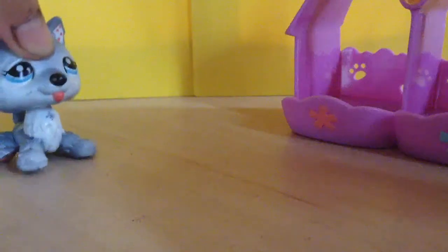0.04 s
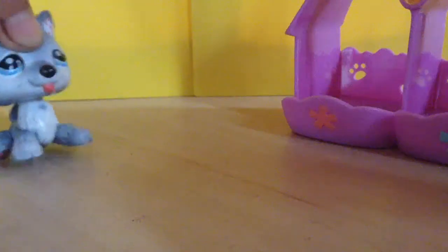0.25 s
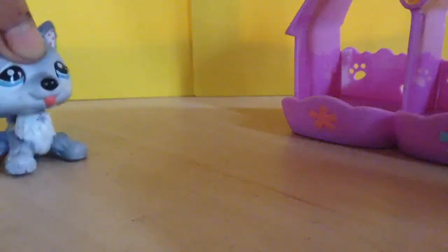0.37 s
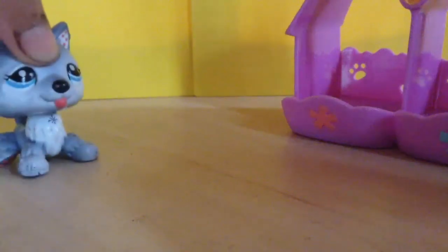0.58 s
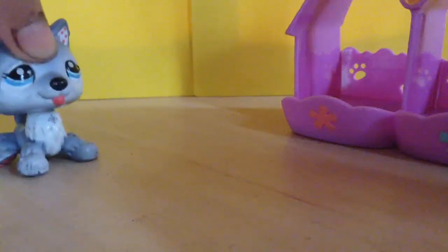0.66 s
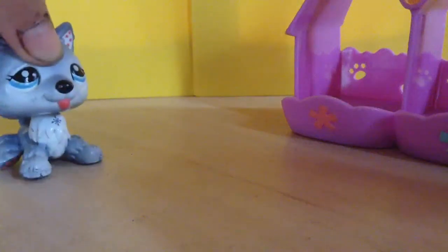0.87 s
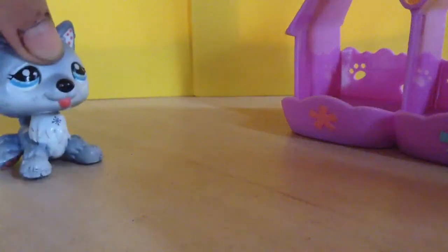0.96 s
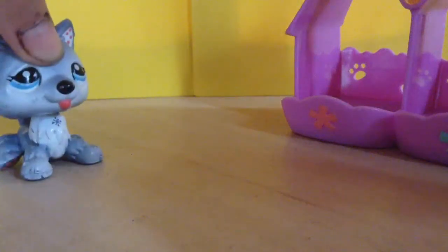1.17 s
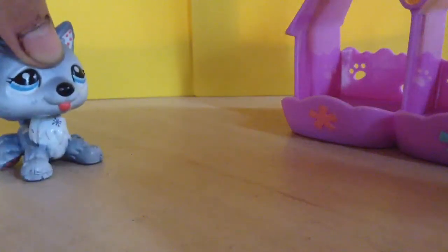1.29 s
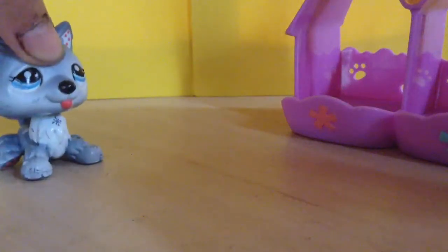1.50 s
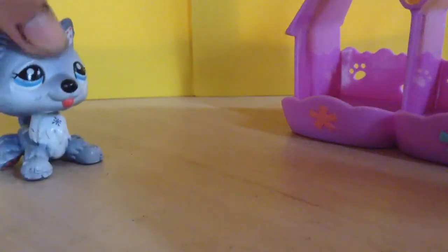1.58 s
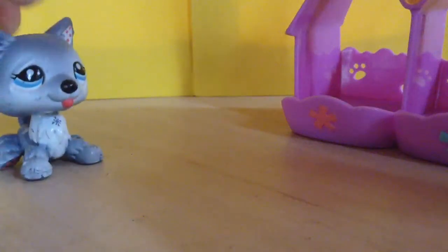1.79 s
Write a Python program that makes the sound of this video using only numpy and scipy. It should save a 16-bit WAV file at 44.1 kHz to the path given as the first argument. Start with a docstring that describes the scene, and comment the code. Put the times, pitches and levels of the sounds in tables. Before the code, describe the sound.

Small woody clacks as a light plastic toy is walked over a table, with faint scuffs

```python
"""In a small room, a hand walks a hollow plastic figure over a wooden table top, close to a microphone.
The feet tap and scuff the board: short pushes and tiny catches ring its modes, a short, woody sound.
The loose plastic head ticks in the treble: a knock and a brief rattle ring the modes of the shell.
Filtered noise, dying away, gives the room its short tail; faint shaped noise is the rumble and hiss."""
import sys
import numpy as np
from scipy import signal
from scipy.fft import rfft, irfft
from scipy.io import wavfile

SR = 44100
rng = np.random.default_rng(int(sys.argv[2]) if len(sys.argv) > 2 else 0)


def convert_level_to_amplitude(level_db):
    """Map a level in decibels to its linear amplitude factor."""
    exponent = np.asarray(level_db, float) / 20
    return 10 ** exponent


def digitize_waveform(pressure):
    """Quantize a signal to 16-bit integers and store it at the path in sys.argv[1].

    Rows of a 2-D input are taken as channels; values are limited to [-1, 1].
    """
    field = np.atleast_2d(pressure).T
    bounded = np.clip(field, -1, 1)
    quanta = np.round(bounded * 32767).astype(np.int16)
    wavfile.write(sys.argv[1], SR, quanta)


N = 81585

# feet landing on the board: t/s, peak level/dB of the wood, f/Hz that this spot favours,
# level/dB of the shell's ring relative to the wood (the sharp edge of the contact)
FOOT_TAPS = [(0.027, -47, 680, -45), (0.053, -43, 1040, -22), (0.108, -36, 1050, -42),
             (0.228, -31.5, 507, -23), (0.339, -17, 1074, -20), (0.354, -14, 985, -28),
             (0.3801, -17, 965, -22.5), (0.451, -36.5, 660, -22), (0.497, -26, 960, -57),
             (0.517, -32, 600, -55), (0.577, -20, 634, -30), (0.5955, -23, 760, -30),
             (0.6113, -24, 1090, -21), (0.709, -42.5, 900, -21), (0.721, -24.5, 780, -26),
             (0.756, -33.5, 527, -12), (0.827, -12, 1030, -21.5), (0.845, -24, 620, -60),
             (0.863, -27, 880, -46), (0.872, -23.5, 565, -22), (1.04, -38.5, 650, -17.5),
             (1.086, -37.5, 555, -43), (1.105, -39, 1010, -23), (1.128, -34.5, 714, -15),
             (1.135, -22, 776, -30), (1.286, -37.5, 736, -24), (1.296, -22, 687, -31),
             (1.35, -37, 1080, -0.5), (1.591, -24, 927, -21), (1.648, -37, 665, -23),
             (1.748, -42.5, 581, -39), (1.777, -45.5, 1330, -35)]
# further taps, each on the spot and with the edge of the tap before it: t/s, peak level/dB of the wood
FOLLOW_TAPS = [(.06, -34), (.115, -31.5), (.129, -31), (.2294, -20.5), (.342, -31), (0.3575, -24.5),
               (.359, -16), (0.3609, -16), (.364, -19.5), (0.3878, -35.5), (.51, -35.5), (.5803, -32),
               (.598, -20.5), (0.6143, -16.5), (0.8302, -22.5), (.849, -19.5), (1.2919, -36.5), (1.601, -28)]
# ticks of the loose head: t/s, peak level/dB, favoured f/Hz
HEAD_TICKS = [(0.0641, -56, 8100), (0.3386, -52, 6960), (0.4773, -52.5, 10800), (0.4973, -61, 9900),
              (0.6095, -55, 10800), (0.827, -45, 8500), (0.846, -51, 7360), (0.8615, -43, 9600),
              (1.0335, -53.5, 10800), (1.1253, -51.5, 12500), (1.287, -51.5, 13400), (1.573, -43, 9460),
              (1.5901, -47, 8000)]
# feet dragged over the grain: start t/s, length t/s, rms level/dB, favoured f/Hz
FOOT_SCUFFS = [(0.196, 0.022, -61.5, 913), (0.238, 0.042, -60.5, 664), (0.466, 0.069, -64, 3750),
               (0.494, 0.027, -48.5, 656), (0.733, 0.033, -54.5, 564), (1.025, 0.059, -66.5, 953),
               (1.098, 0.05, -60.5, 4530), (1.157, 0.058, -66.5, 990), (1.208, 0.076, -70.5, 2360),
               (1.289, 0.074, -54.5, 2260), (1.573, 0.049, -55, 3580), (1.601, 0.067, -59, 680),
               (1.724, 0.067, -64, 268)]
# ringing modes of the wooden board: f/Hz, relative level/dB, time to fall by 60 dB t/s
BOARD_MODES = [(293.3, -5.5, 0.1), (607.6, -4.5, 0.069), (680, -6.5, 0.043), (762.4, 8, 0.015),
               (980, 4, 0.026), (1094.5, 1.5, 0.019), (1395, -1, 0.015), (1475.8, -3.5, 0.045),
               (2360, -7, .015)]
# ringing modes of the plastic shell: f/Hz, relative level/dB, time to fall by 60 dB t/s
SHELL_MODES = [(2735, 9, 0.0018), (3750, -2, 0.01), (4800, -4.5, 0.0079), (7470, 1.5, 0.0056),
               (8940, -3.5, 0.0086), (10290, 4, 0.0032), (12960, -3.5, .006)]
# colour of the rumble and hiss: f/Hz, relative level/dB per Hz
FLOOR_COLOUR = [(40, -21.5), (170, 4.5), (1140, -14.5), (2500, -3.5), (15000, -8)]

SCATTER_DB, DETUNE = 3.5, 0.04  # random spread of each mode's level (dB) and pitch (share)
SHELL_RISE_S = 0.0001  # time in which the shell swells up
SHELL_DEPTH_DB = 30  # most that a tap or tick weakens a shell mode


def fade(t, t60):
    """Falls by 60 dB in t60 seconds."""
    return np.exp(-np.log(1000) * t / t60)


def add(out, x, start_s):
    """Mixes x into out from start_s seconds on."""
    i = int(start_s * SR)
    out[i:i + len(x)] += x[:len(out) - i]


def ring(modes, gain_db, rise_s=0, detune=0):
    """One blow starts a set of fading sines, each raised by gain_db and shifted in pitch by a share."""
    hz, db, t60 = np.array(modes, float).T[:, :, None]
    hz = hz * (1 + np.reshape(detune, (-1, 1)))
    t = np.arange(SR // 5) / SR
    strength = convert_level_to_amplitude(db + np.reshape(gain_db, (-1, 1)))
    x = -np.sum(strength * fade(t, t60) * np.sin(2 * np.pi * hz * t), axis=0)
    if rise_s:
        x = x * (1 - np.exp(-t / rise_s)) ** 2
    return x


def favour(modes, hz, octaves, depth_db):
    """Gain in dB per mode: those far from the favoured pitch are weaker, by up to depth_db."""
    distance = np.log2(np.array(modes)[:, 0] / hz) / octaves
    return -depth_db * (1 - np.exp(-0.5 * distance ** 2))


def chance(modes):
    """Random level offset (dB) and pitch shift (share) for each mode, so that no two blows are alike."""
    return rng.standard_normal((2, len(modes))) * [[SCATTER_DB], [DETUNE]]


def taps():
    """A short push, longer for gentle taps, rings the board; the hard edge of the foot rings the shell."""
    contact_s = 0.00038  # length of a push that peaks at 0 dB
    softer_per_db = 0.2  # dB by which the push lengthens for each dB that the tap is weaker
    out = np.zeros(N)
    blows = list(FOOT_TAPS)
    for s, db in FOLLOW_TAPS:
        last_tap = max(tap for tap in FOOT_TAPS if tap[0] < s)
        blows.append((s, db) + tuple(last_tap[2:]))  # same spot, same edge
    for s, db, hz, edge_db in blows:
        push = np.hanning(int(contact_s * convert_level_to_amplitude(-softer_per_db * db) * SR) + 3) ** 2
        scatter, detune = chance(BOARD_MODES)
        gain = favour(BOARD_MODES, hz, 0.27, 12) + scatter
        wood = np.convolve(ring(BOARD_MODES, gain, 0, detune), push)
        scatter, detune = chance(SHELL_MODES)
        gain = favour(SHELL_MODES, 3000, 0.43, SHELL_DEPTH_DB) + scatter
        shell = ring(SHELL_MODES, gain, SHELL_RISE_S, detune)
        add(out, wood * convert_level_to_amplitude(db) / abs(wood).max(), s)
        add(out, shell * convert_level_to_amplitude(db + edge_db) / abs(shell).max(), s)
    return out


def ticks():
    """The head knocks its peg and rattles for a few ms; the shell rings."""
    rattle_s = 0.0055  # time in which the rattle falls to 37 percent
    rattle_gain = convert_level_to_amplitude(-8) / 20  # against a knock of 1
    out = np.zeros(N)
    t = np.arange(SR // 25) / SR
    for s, db, hz in HEAD_TICKS:
        # cubed noise: a few strong hits among many weak ones
        rattle = rattle_gain * rng.standard_normal(len(t)) ** 3 * np.exp(-t / rattle_s)
        rattle[0] = 1  # the knock itself
        scatter, detune = chance(SHELL_MODES)
        gain = favour(SHELL_MODES, hz, 0.46, SHELL_DEPTH_DB) + scatter
        x = signal.fftconvolve(ring(SHELL_MODES, gain, SHELL_RISE_S, detune), rattle)
        add(out, x * convert_level_to_amplitude(db) / abs(x).max(), s)
    return out


def grain_catches():
    """Dense tiny catches on the grain: clicks at random times, of random strength and sign."""
    per_second, spread_db = 1000, 4
    happens, strength, side = rng.random((3, N))
    clicks = (happens < per_second / SR) * convert_level_to_amplitude(-spread_db * np.log(strength + 0.03))
    return clicks * np.sign(side - 0.5)


def scuffs(catches):
    """While a foot drags, its catches on the grain ring board and shell, swelling and fading."""
    octaves, depth_db, shell_db = 0.33, 19.5, -11.5
    out = np.zeros(N)
    for s, length, db, hz in FOOT_SCUFFS:
        n, i = int(length * SR), int(s * SR)
        wood = ring(BOARD_MODES, favour(BOARD_MODES, hz, octaves, depth_db))
        shell = ring(SHELL_MODES, shell_db + favour(SHELL_MODES, hz, octaves, depth_db), SHELL_RISE_S)
        swell = np.sin(np.pi * np.linspace(0, 1, n) ** 0.95) ** 0.5
        x = signal.fftconvolve(catches[i:i + n] * swell, wood + shell)
        add(out, x * convert_level_to_amplitude(db) / np.sqrt(np.sum(x ** 2) / n), s)
    return out


def fidget(catches):
    """The fingers fidget faintly throughout: the catches ring all modes of the board."""
    x = signal.fftconvolve(catches, ring(BOARD_MODES, 0))[:N]
    return convert_level_to_amplitude(-73.5) * x / np.sqrt(np.mean(x ** 2))


def room(x):
    """Dense, dull echoes that die away: x is smeared by fading noise without much treble."""
    level_db, t60_s, top_hz, gap_s = -20, 0.17, 4000, 0.005  # the echoes build up over gap_s
    t = np.arange(SR // 2) / SR
    dull = signal.butter(2, top_hz, fs=SR, output="sos")
    tail = signal.sosfilt(dull, rng.standard_normal(len(t)))
    tail = tail * fade(t, t60_s) * np.minimum(t / gap_s, 1)
    return convert_level_to_amplitude(level_db) * signal.fftconvolve(x, tail / np.sqrt(np.sum(tail ** 2)))[:N]


def floor():
    """Steady rumble and hiss: noise coloured in the spectrum."""
    hz = np.arange(N // 2 + 1) * SR / N + 1  # 1 Hz up, to keep the logarithm finite
    colour_hz, colour_db = np.array(FLOOR_COLOUR).T
    colour = convert_level_to_amplitude(np.interp(np.log(hz), np.log(colour_hz), colour_db))
    x = irfft(rfft(rng.standard_normal(N)) * colour, N)
    return convert_level_to_amplitude(-78) * x / np.sqrt(np.mean(x ** 2))


def scene():
    """Figure and table in the room; the board radiates no deep bass."""
    low_cut_hz, dip_hz, dip_width_hz = 262, 444, 198
    catches = grain_catches()
    near = taps() + ticks() + scuffs(catches) + fidget(catches)
    near = signal.sosfilt(signal.butter(6, low_cut_hz, "high", fs=SR, output="sos"), near)
    # the board is silent between its thump and its knock
    near = signal.lfilter(*signal.iirnotch(dip_hz, dip_hz / dip_width_hz, fs=SR), near)
    return (near + room(near) + floor())[None]


def low_pass(x):
    """Removes everything above the highest recorded frequency."""
    return signal.sosfilt(signal.butter(12, 15770, fs=SR, output="sos"), x)


def record(dry):
    """The microphone capsule bends loud peaks a little to one side; then the top is cut."""
    lopsided, top_hz = 0.11, 15000
    bent = dry + lopsided * dry ** 2
    mix = signal.sosfilt(signal.ellip(8, 0.2, 60, top_hz, fs=SR, output="sos"), bent)
    return low_pass(mix)


dry = scene()
out = record(dry)
digitize_waveform(out)
```